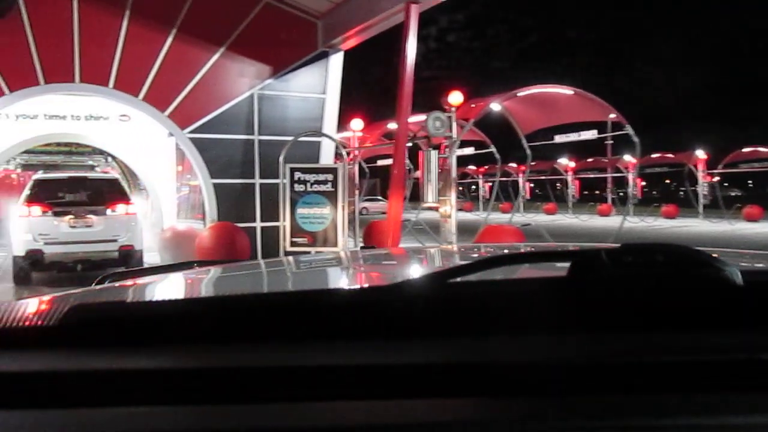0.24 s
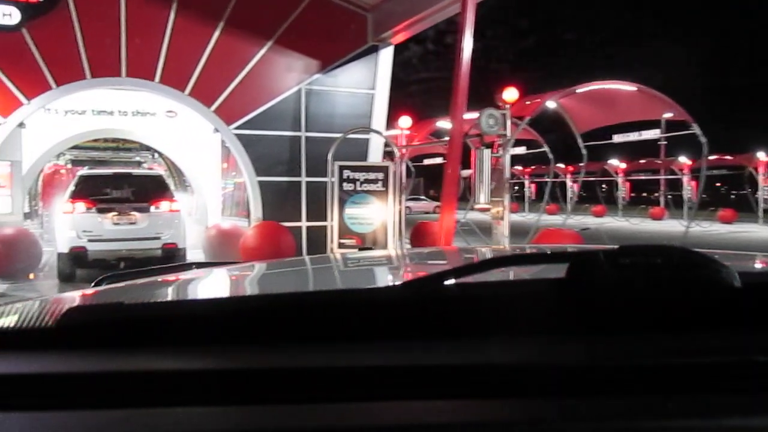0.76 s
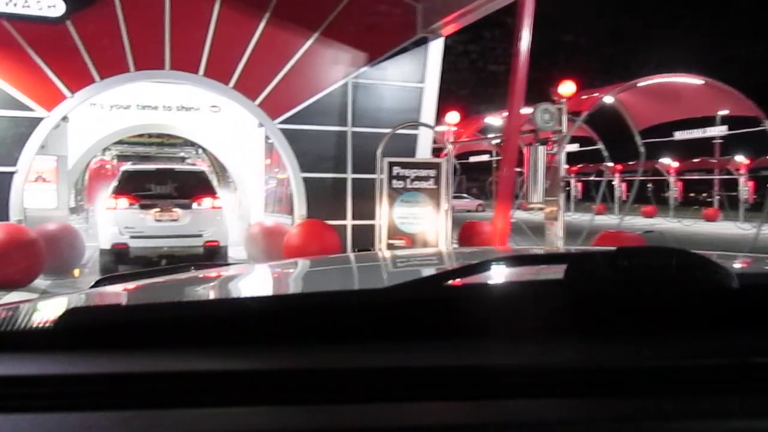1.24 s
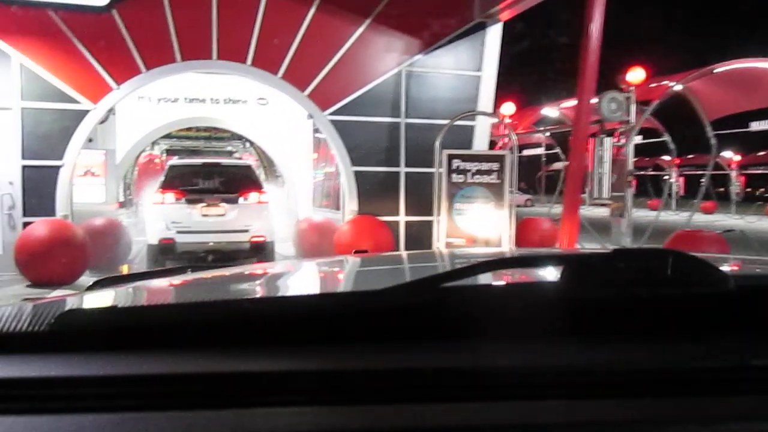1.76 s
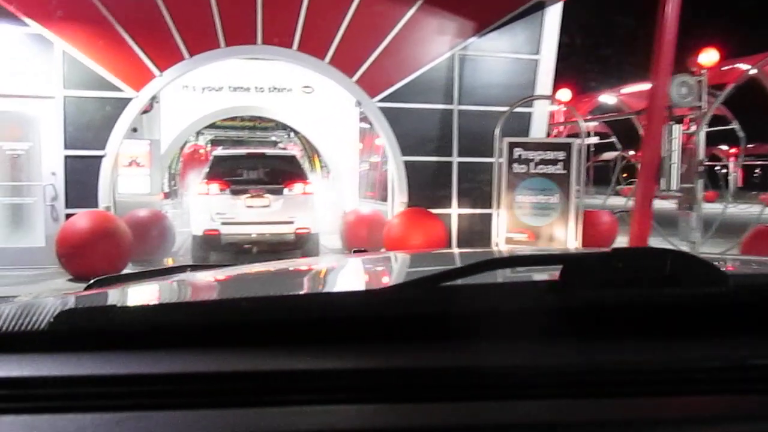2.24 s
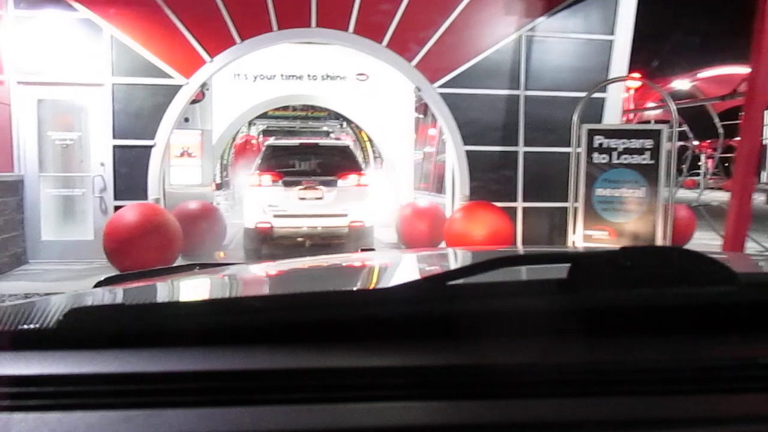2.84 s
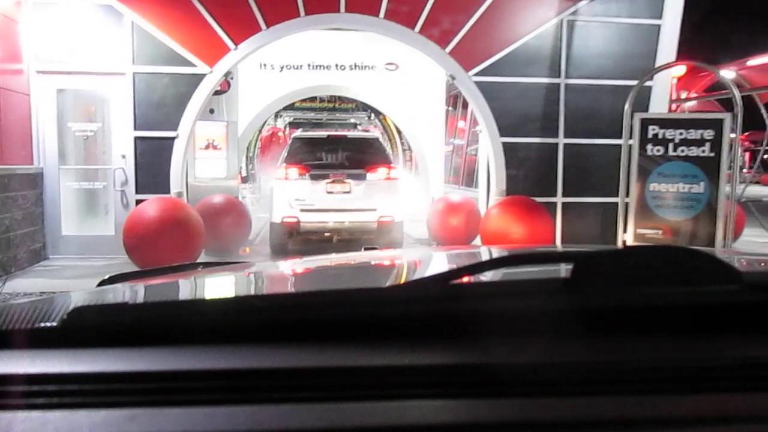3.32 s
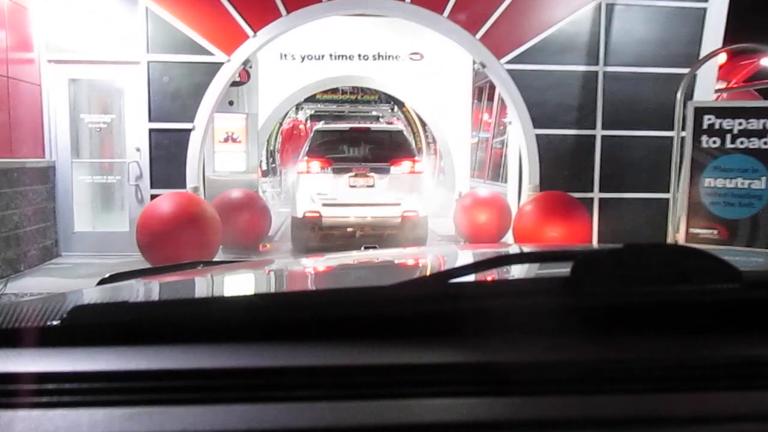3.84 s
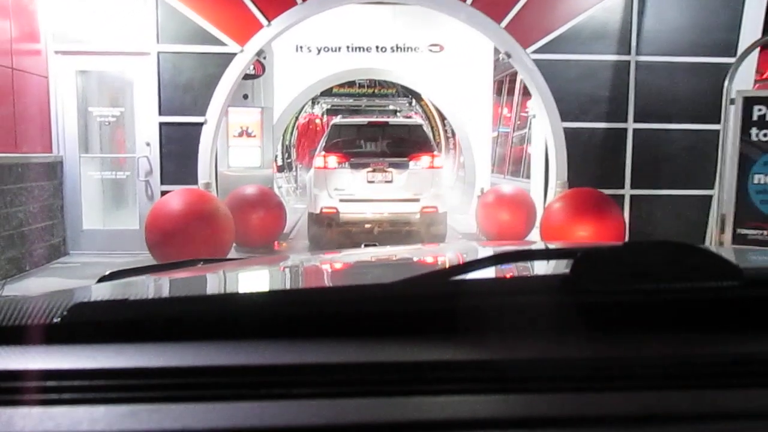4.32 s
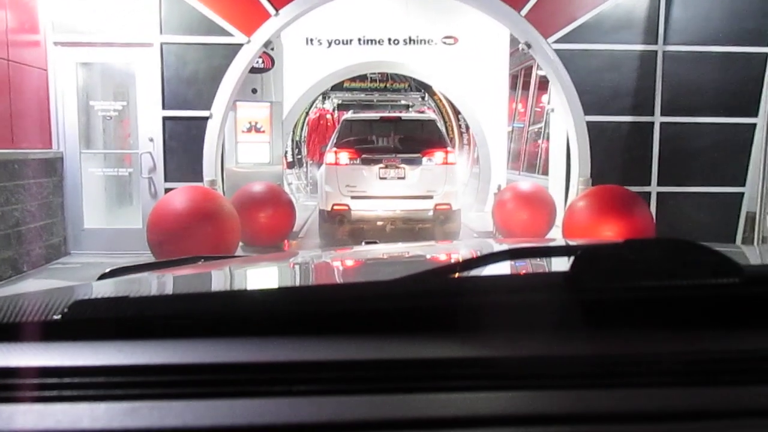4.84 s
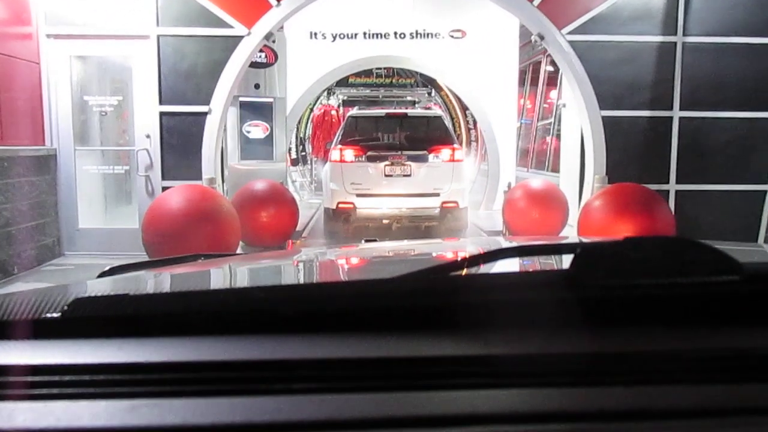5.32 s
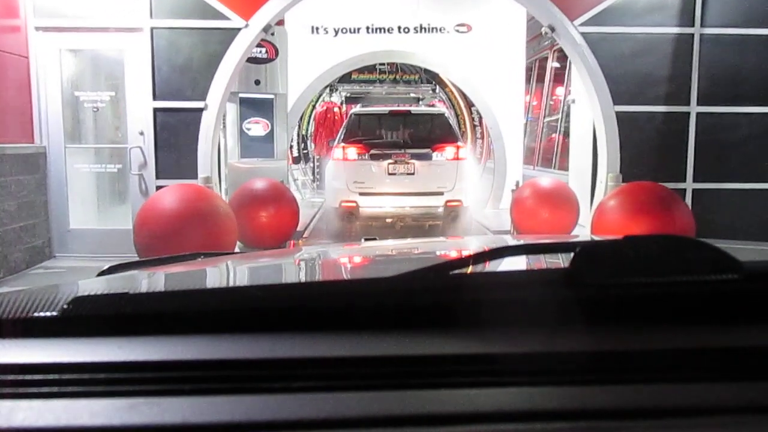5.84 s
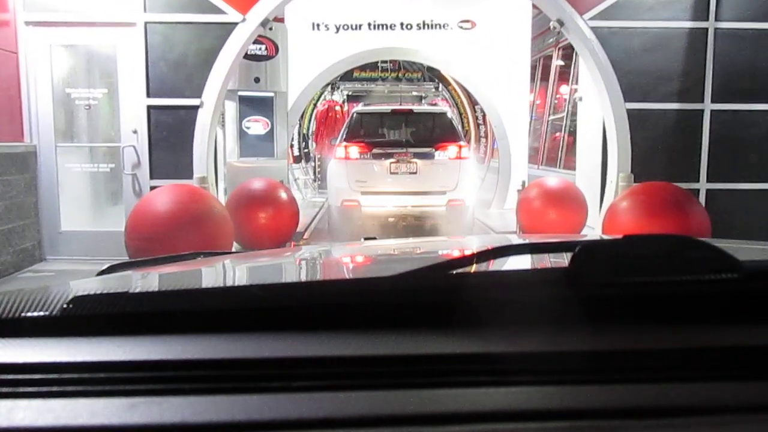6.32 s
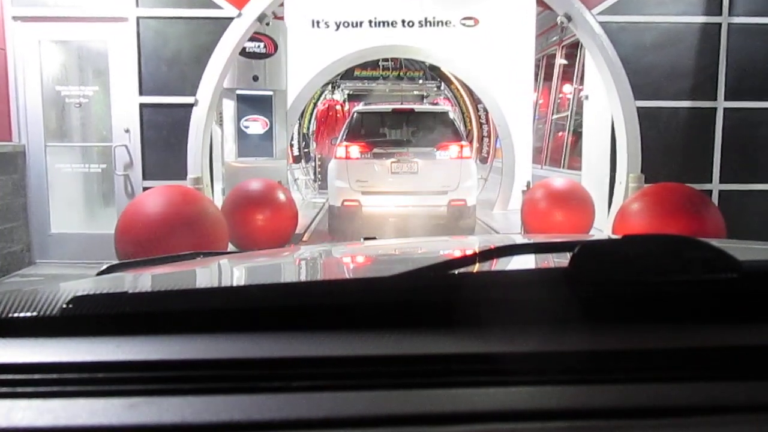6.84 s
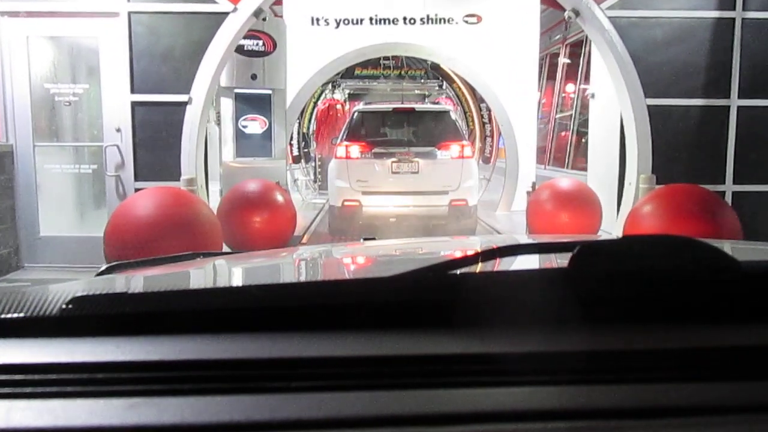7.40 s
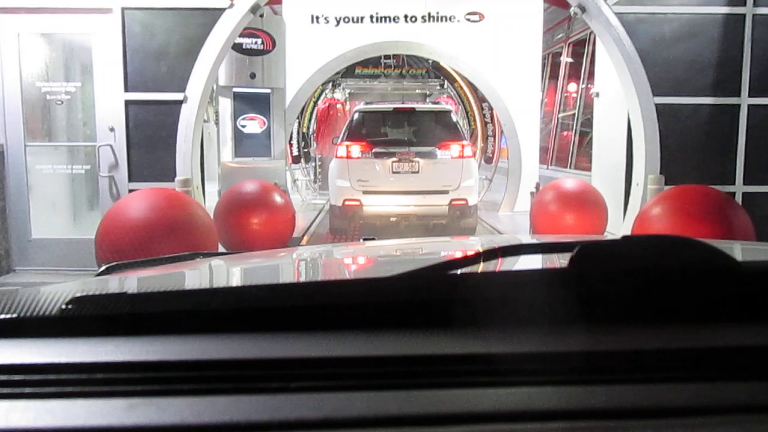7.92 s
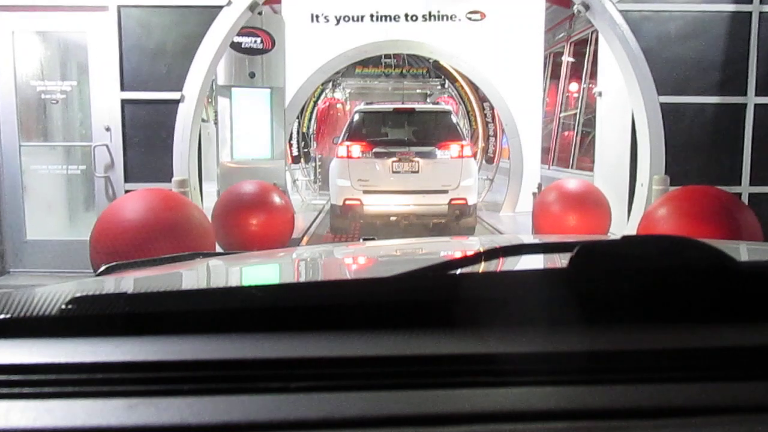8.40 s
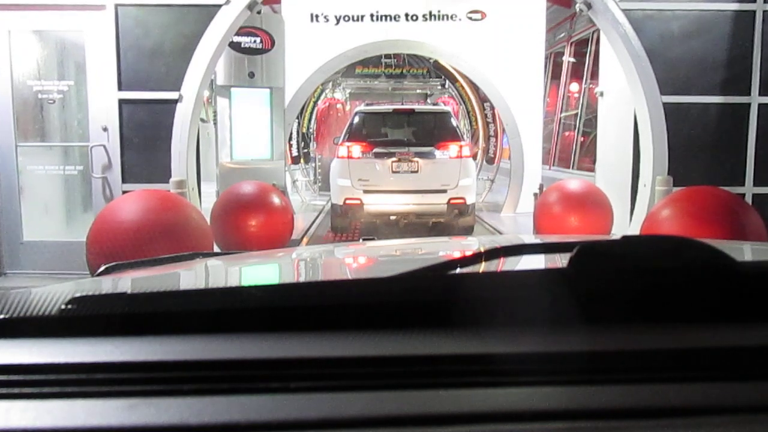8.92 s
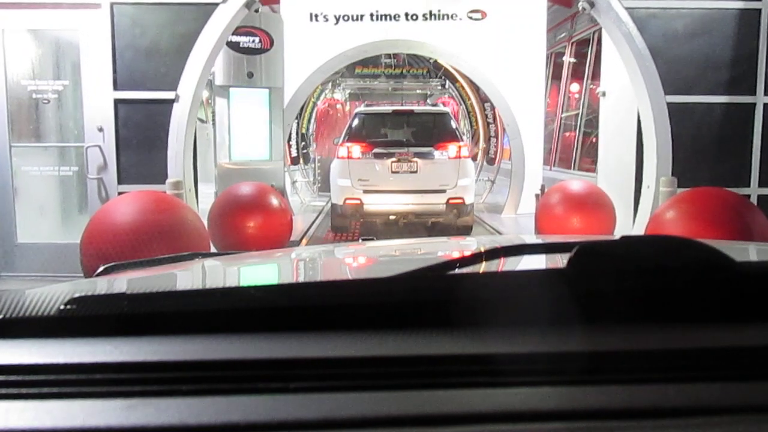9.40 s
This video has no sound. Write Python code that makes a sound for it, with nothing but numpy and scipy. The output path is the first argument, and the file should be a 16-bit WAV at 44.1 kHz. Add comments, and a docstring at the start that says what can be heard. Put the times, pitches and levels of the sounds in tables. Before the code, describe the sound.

Muffled car cabin: engine hum sinks to idle, a deep machine drone swells past, palm rubs the steering wheel, dull wash roar grows.

```python
"""Engine heard inside a car that rolls up to a tunnel car wash: wavering sines that follow the engine
rate sink to idle. A wavering machinery drone beats against it; pumps hum and higher moans come and go.
A hand ticks and slides on the steering wheel: shaped noise under snaps and strokes.
Trim chirps (tone) and knocks (noise); short low tones swell: bump thuds, a moan, brief engine booms.
The wash roars dully through closed windows and its spray swells near the end: shaped stereo noise."""
import sys
import numpy as np
from scipy import signal
from scipy.fft import rfft, irfft, next_fast_len
from scipy.io import wavfile
from scipy.ndimage import uniform_filter1d, map_coordinates

SR = 44100
rng = np.random.default_rng(int(sys.argv[2]) if len(sys.argv) > 2 else 0)


def digitize_waveform(pressure):
    """Quantize a signal to 16-bit integers and store it at the path in sys.argv[1].

    Rows of a 2-D input are taken as channels; values are limited to [-1, 1].
    """
    field = np.atleast_2d(pressure).T
    bounded = np.clip(field, -1, 1)
    quanta = np.round(bounded * 32767).astype(np.int16)
    wavfile.write(sys.argv[1], SR, quanta)


N = 426006

# engine rate before hunting; sinks, undershoots, settles: t/s, f/Hz
ENGINE_RATE = [(0, 59.88), (.95, 55), (1.42, 54.7), (1.9, 45.63), (2.15, 38.1), (2.6, 37.1), (3.1, 40.7),
               (4, 41.2), (4.6, 39.35), (5.2, 41), (9.66, 40.7)]

# engine
LIFT_OFF_S, LIFT_OFF_TAKES_S = 1.47, 0.82  # the foot leaves the pedal
IDLE_FROM_S, IDLE_HZ = 3.15, 40.4
HUNT_FROM_S, HUNT_PERIOD_S, HUNT_CREST_S = 4.7, 1.25, 8.3  # the idle slowly rises and sags
HUNT_HZ, HUNT_DB = 0.48, 2
FIRING_DB, IDLE_GAIN_DB, OVERTONE_DB, BELT_DB, BELT_OFF_DB = -32, 3.4, -34.5, -53.5, -19
COAST_S, COAST_HALF_S, COAST_DB = 2, 0.14, -5  # overtones soften while the engine coasts down
STRAIN_SAG = 0.68  # dB lost by the firing tone per dB of strain

# machinery drone as the car passes it
DRONE_HZ, DRONE_PEAK_DB, DRONE_NEAREST_S = 54.6, -13, 1.596
DRONE_RISE_DB_PER_S, DRONE_FALL_DB_PER_S = 8.5, 21

# hand
STROKE_SHAPE = 1.64  # 1 is pointed, 2 is a bell
TICK_T60_S = 0.038

# cabin noise: dB at IDLE_HZ, and dB more per Hz of engine rate
RUMBLE_DB, RUMBLE_DB_PER_HZ = -33, 0.21
ROAR_DB, ROAR_DB_PER_HZ = -41, 0.14
SPRAY_DB, SPRAY_DB_PER_HZ = -51, 0.11
WASH_START_S, WASH_RISE_S = 7.06, 0.34  # more jets open up
WASH_RUMBLE_DB, WASH_ROAR_DB, WASH_SPRAY_DB = 1.2, 3.5, 3.6

TOP_HZ = 15800  # band limit


def amp(db):
    """Decibels to gain."""
    return 10 ** (np.asarray(db) / 20)


def unit(x):
    """Scaled to rms 1."""
    return x / np.sqrt(np.mean(x ** 2) + 1e-20)


def clock():
    """Time of each sample in s."""
    return np.arange(N) / SR


def age_since(s):
    """Seconds since time s, 0 before it."""
    return np.maximum(clock() - s, 0)


def along(points, hz):
    """(Hz, value) points joined on a log-frequency axis."""
    f, v = np.transpose(points)
    return np.interp(np.log(hz + 1), np.log(f + 1), v)


def engine_rate_hz():
    """Engine rate per sample, before hunting."""
    t, hz = np.transpose(ENGINE_RATE)
    return np.interp(clock(), t, hz)


def ramp(s, length):
    """Goes from 0 to 1 in length seconds, starting at time s."""
    return np.clip((clock() - s) / length, 0, 1)


def swell(s, half):
    """Bell-shaped rise and fall around time s."""
    return np.exp(-np.minimum(((clock() - s) / half) ** 2, 60))


def wobble(rate):
    """Smooth random curve, rate knots a second."""
    knots = rng.standard_normal(int(N * rate / SR) + 4)
    coarse = clock()[::64]
    return np.interp(clock(), coarse, map_coordinates(knots, [coarse * rate]))


def wavering(hz, rate, stray):
    """Tone of rms 1 whose phase strays at random, stray in rad."""
    return np.sqrt(2) * np.sin(2 * np.pi * hz * clock() + stray * wobble(rate))


def filtered(x, response):
    """x times a response of frequency, padded against wrap-around."""
    m = next_fast_len(N + SR // 2)
    return irfft(rfft(x, m) * response(np.fft.rfftfreq(m, 1 / SR)), m)[..., :N]


def pan(left_db):
    """Gains of the two channels; left is left_db above right."""
    return amp([[left_db / 2], [-left_db / 2]])


def rush(spectrum, patchy_db):
    """Shaped stereo noise of rms 1 with patches of random gain; the bass is alike in both channels."""
    # left-right likeness: f/Hz, correlation
    likeness = [(60, 0.87), (200, 0.94), (380, 0.93), (700, 0.79), (1290, 0.16), (2380, 0.19),
                (4400, -0.25), (8000, 0.026)]
    z = signal.stft(rng.standard_normal((2, N)), nperseg=1024)[2]
    field = uniform_filter1d(rng.standard_normal(z.shape[1:]), size=5, axis=0)
    field = uniform_filter1d(field, size=8, axis=1)
    pair = signal.istft(z * amp(patchy_db * unit(field)), nperseg=1024)[1][:, :N]

    def mid_side_response(hz):
        turn = np.arccos(np.clip(along(likeness, hz), -1, 1)) / 2
        skirt = 1 / (1 + (hz / spectrum[-1][0] / 2) ** 2)
        return amp(along(spectrum, hz)) * skirt * [np.cos(turn), np.sin(turn)]

    mid, side = filtered(pair, mid_side_response)
    return unit(np.array([mid + side, mid - side]))


def strain_db():
    """Strain while the wheels are steered: lifts overtones and tyre rumble, sags the firing tone."""
    # steering efforts: t/s, lift/dB, half length/s
    steers = [(2.896, 0.5, 0.27), (4.495, 3, 0.37)]
    return sum(db * swell(s, half) for s, db, half in steers)


def boom_db(hz):
    """Lift of a partial while it crosses a cabin resonance."""
    # cabin resonances: f/Hz, half width/Hz, lift/dB
    booms = [(76.28, 5.77, 9.5), (244.4, 4.8, 6.5), (297, 14, 7), (325, 14, 4.5), (479, 13, 5.5),
             (1610, 84, 9)]
    return sum(db / (1 + ((hz - centre) / width) ** 2) for centre, width, db in booms)


def engine():
    """Firing tone, uneven overtones and belt whine follow the engine rate, each wavering on its own."""
    # overtones: multiple of engine rate, level/dB
    overtones = [(.5, -7.5), (2, -7.5), (3, -9.5), (4, -27), (5, -24.5), (6, -15), (7, -43.5), (8, -28),
                 (9, -23), (12, -24.5)]
    # belt-driven parts: multiple of engine rate, level/dB
    belt = [(21.4, -9.5), (23.9, -10.5), (26.2, -14), (28.65, -11), (31, -6.5)]
    idling = ramp(IDLE_FROM_S, length=0.069)
    hunt = np.cos(2 * np.pi * (clock() - HUNT_CREST_S) / HUNT_PERIOD_S)
    hunt = ramp(HUNT_FROM_S, length=0.16) * hunt
    rate_hz = engine_rate_hz() + HUNT_HZ * hunt
    angle = 2 * np.pi * np.cumsum(rate_hz) / SR

    firing_db = FIRING_DB + IDLE_GAIN_DB * idling + HUNT_DB * hunt - STRAIN_SAG * strain_db()
    overtone_db = OVERTONE_DB + strain_db() + COAST_DB * swell(COAST_S, COAST_HALF_S)
    belt_db = BELT_DB + BELT_OFF_DB * ramp(LIFT_OFF_S, LIFT_OFF_TAKES_S)

    def order(k, rough, pace):
        # phase and level waver separately
        tone = np.sqrt(2) * np.sin(k * angle + rough * wobble(pace))
        return tone * amp(9.9 * rough * wobble(pace))

    def stack(rows, rough, pace):
        return sum(amp(db + boom_db(k * rate_hz)) * order(k, rough, pace) for k, db in rows)

    firing = amp(firing_db) * order(0.99, rough=0.086, pace=10)
    upper = amp(overtone_db) * stack(overtones, rough=0.26, pace=10)
    upper += amp(belt_db) * stack(belt, rough=0.19, pace=28)
    return firing * pan(left_db=-4.0) + upper * pan(left_db=-1.6)


def machinery():
    """A deep motor drone swells and fades as the car passes; pumps hum and higher moans come and go."""
    # steady pump motors: f/Hz, level/dB
    pumps = [(55, -38), (148, -45.5), (729, -58), (1220, -66.5), (1592, -66), (1707, -67.5)]
    # moans through the glass: t/s, level/dB, f/Hz, half length/s
    moan_rows = [(7.277, -41.5, 478, 0.29), (9.538, -41, 472, 0.22)]
    past_s = clock() - DRONE_NEAREST_S
    swell_db = np.minimum(DRONE_RISE_DB_PER_S * past_s, -DRONE_FALL_DB_PER_S * past_s)
    drone = amp(DRONE_PEAK_DB + swell_db) * wavering(DRONE_HZ, rate=7, stray=0.034)
    hum = sum(amp(db) * wavering(hz, rate=12, stray=1.25) for hz, db in pumps)
    moans = sum(amp(db) * swell(s, half) * wavering(hz, rate=10, stray=0.16)
                for s, db, hz, half in moan_rows)
    return (drone + hum + moans) * pan(left_db=-1.7)


def stroke(s, rise, fall):
    """The palm gathers speed until time s, then slows."""
    away = np.maximum((s - clock()) / rise, (clock() - s) / fall)
    return np.exp(-np.minimum(np.abs(away), 10) ** STROKE_SHAPE)


def palm_slides():
    """Skin rubs over the wheel's grain in a fine hiss, brighter the faster it slides."""
    # strokes: t at the fastest/s, level before trims/dB, rise/s, fall/s
    strokes = [(1.42, -52.5, 0.1, 0.18), (1.88, -53, 0.37, 0.68), (2.85, -46.5, 0.43, 0.19),
               (4.5, -54, 0.8, 0.34), (5.2, -42, 0.35, 0.25), (5.69, -53.5, 0.095, .07),
               (6.4, -59.5, 0.65, 0.22), (9.2, -53.5, 0.17, 0.066)]
    # palm noise: f/Hz, density/dB
    palm = [(1500, -32), (2700, 1), (3200, -2.5), (4200, -2), (5020, 3), (5550, 0), (6700, 3.5),
            (7700, -2.5), (8450, 2.5), (10600, -7.5), (12400, -6), (14000, -4.5), (16000, -4.5)]
    # fast-slide noise: f/Hz, density/dB
    sheen = [(6000, -30), (11000, -8.5), (12400, -4), (14000, -10), (16000, -12)]
    power = sum((amp(db) * stroke(s, rise, fall)) ** 2 for s, db, rise, fall in strokes)
    slide_db = 10 * np.log10(power) + .6 * wobble(90)
    rub = amp(slide_db - 2.0) * rush(palm, patchy_db=1.0)
    # steeper than the palm noise, so fast slides brighten
    return rub + amp(1.407 * slide_db + 12.5) * rush(sheen, patchy_db=.5)


def finger_ticks():
    """Fingers let go with quick snaps, mixed from soft-pad and hard-tip noise."""
    # ticks: t/s, level before trim/dB, brightness 0-1
    ticks = [(.256, -37.5, .25), (.373, -39, 0.9), (0.786, -32.5, 0.5), (0.793, -33.5, 1),
             (.9475, -35, .85), (1.07, -35, 0.8), (1.216, -33, 0.7), (1.3005, -43, 0.4),
             (1.352, -34.5, .45), (1.408, -37, .2), (1.732, -39, .2), (4.351, -42, .1), (4.372, -40, 0),
             (4.3914, -40, .25), (4.4896, -36.5, 0.5), (4.5087, -39, 0), (4.555, -34, 0.4),
             (4.7955, -36.5, .75), (5.673, -44, .05), (5.7443, -42.5, .95), (8.4063, -46, .2)]
    # soft pad noise: f/Hz, density/dB
    finger = [(1500, -25), (2900, 5), (4200, -2), (5000, 8.5), (6700, -2), (9000, -1), (16000, -37)]
    # hard tip noise: f/Hz, density/dB
    nail = [(2000, -22), (4300, -11), (6500, 4), (8400, 0), (10500, -2), (12500, 0), (16000, -18)]
    soft, hard = np.zeros((2, N))
    for s, db, bright in ticks:
        age = age_since(s)
        # quick snap, then a weak answer from the cabin
        decay = amp(-60 * age / TICK_T60_S) + .07 * amp(-60 * age / .08)
        snap = amp(db - 5) * (1 - np.exp(-age / .0004)) * decay
        share = np.clip(bright, 0, 1)
        soft += snap * np.sqrt(1 - share)
        # the bright part is weighted towards the first instant
        hard += snap * np.sqrt(share) * (.85 + 1.2 * np.exp(-age / .0012))
    return soft * rush(finger, patchy_db=2.3) + hard * rush(nail, patchy_db=3.5)


def hand():
    """Palm slides and finger ticks on the wheel, slightly to the left."""
    return (palm_slides() + finger_ticks()) * pan(left_db=2.5)


def trim_chirps():
    """Plastic trim chirps in brief bells of one wavering tone."""
    # chirps: t/s, level/dB
    chirps = [(1.932, -39), (1.972, -37.5), (2.029, -38.5), (2.42, -42), (3.237, -37.5), (3.486, -39),
              (5.433, -41), (7.68, -40)]
    bells = sum(amp(db) * swell(s, half=0.0082) for s, db in chirps)
    return bells * wavering(hz=828, rate=100, stray=0.18)


def trim_knocks():
    """Panels knock: decaying dull noise plus a plastic clack."""
    # knocks: t/s, dull panel/dB, plastic clack/dB
    knock_rows = [(1.671, -36, -37), (4.602, -32.5, -51)]
    # dull panel noise: f/Hz, density/dB
    panel_shape = [(150, -6), (480, 13.5), (620, -1), (800, 8), (1050, -1), (1230, 3), (1450, -5),
                   (1900, -13), (2600, -8), (5000, -39)]
    # plastic clack noise: f/Hz, density/dB
    clack_shape = [(600, -27), (1000, 2), (1250, 0), (1800, 4), (2300, -8), (3200, -21)]
    panel = rush(panel_shape, patchy_db=0)
    clack = rush(clack_shape, patchy_db=0)
    knocks = np.zeros((2, N))
    for s, panel_db, clack_db in knock_rows:
        age = age_since(s)
        envelope = (1 - np.exp(-age / 0.0011)) * amp(-60 * age / 0.14)
        knocks += envelope * (amp(panel_db) * panel + amp(clack_db) * clack)
    return knocks


def cabin_tones():
    """Short low tones swell in the cabin: bump thuds, an opening moan and brief engine booms."""
    # short cabin tones: t/s, level/dB, centre f/Hz, half length/s
    tones = [(.025, -33.5, 338, 0.019), (0.072, -35, 514, .08), (.247, -38, 145, .35),
             (0.403, -38, 330.5, 0.02), (1.28, -29, 160, 0.015), (1.279, -31, 245, 0.015),
             (1.74, -34, 293, 0.114), (4.605, -30.5, 122, 0.16)]
    return sum(amp(db) * swell(s, half) * wavering(hz, rate=55, stray=0.78)
               for s, db, hz, half in tones)


def cabin_noise():
    """Tyre rumble, tunnel roar and spray ease with the engine and grow with the jets; a faint hiss stays."""
    # tyre rumble: f/Hz, density/dB
    rumble_shape = [(15, -6.5), (28, 1.5), (45, 0), (65, 0), (100, -6.5), (150, -8), (200, -9),
                    (280, -12.5), (450, -33.5)]
    # wash roar dulled by the glass: f/Hz, density/dB
    roar_shape = [(130, -8.5), (230, -2.5), (320, 2.5), (385, 0.5), (440, 2), (510, 0), (570, -5.5),
                  (690, -8), (770, -5), (900, -8), (1100, -31.5), (1800, -40.5)]
    # spray dulled by the glass: f/Hz, density/dB
    spray_shape = [(500, -14.5), (950, 1.5), (1230, 0), (1420, -2.5), (1650, -1), (1900, -7), (2250, -10.5),
                   (2700, -6.5), (3500, -19.5), (5000, -36), (15000, -44)]
    # faint hiss: f/Hz, density/dB
    hiss_shape = [(2000, -2.5), (4000, -0.5), (5300, -2), (6300, 0.5), (7500, -6), (8500, -4.5),
                  (10500, -11.5), (12500, -7.5), (16000, -12.5)]
    above_idle_hz = engine_rate_hz() - IDLE_HZ
    jets = ramp(WASH_START_S, WASH_RISE_S)
    rumble_db = RUMBLE_DB + RUMBLE_DB_PER_HZ * above_idle_hz + WASH_RUMBLE_DB * jets + strain_db()
    roar_db = ROAR_DB + ROAR_DB_PER_HZ * above_idle_hz + WASH_ROAR_DB * jets
    spray_db = SPRAY_DB + SPRAY_DB_PER_HZ * above_idle_hz + WASH_SPRAY_DB * jets
    noise = amp(rumble_db) * rush(rumble_shape, patchy_db=1.5)
    noise += amp(roar_db) * rush(roar_shape, patchy_db=1.48)
    noise += amp(spray_db) * rush(spray_shape, patchy_db=1)
    hiss = amp(-58.0) * rush(hiss_shape, patchy_db=2.0)
    return noise * pan(left_db=-1.2) + hiss * pan(left_db=.5)


def scene():
    """Everything as heard from the front seat."""
    trim = trim_chirps() + trim_knocks()
    return engine() + machinery() + hand() + trim + cabin_tones() + cabin_noise()


def record(dry):
    """Two microphone ports differ slightly in phase; nothing passes above the band limit."""
    # left port's phase lead: f/Hz, lead/rad
    lead = [(25, 0.1), (55, 0.51), (115, 0.27), (170, 0.28), (480, 0.29), (780, 0.55), (1200, -0.15),
            (1650, -1.4), (2600, -0.18), (4000, 0.19)]

    def response(hz):
        # half the lead on each port, with opposite signs
        ports = np.exp(.5j * along(lead, hz) * np.array([[1], [-1]]))
        return (hz < TOP_HZ) * ports

    return filtered(dry, response)


dry = scene()
out = record(dry)
digitize_waveform(out)
```